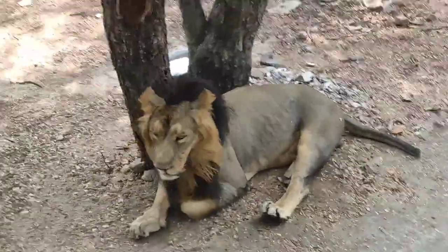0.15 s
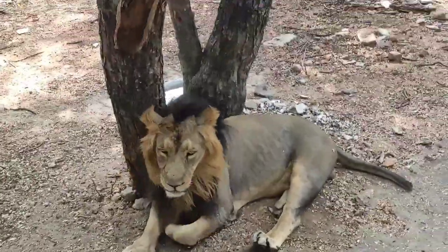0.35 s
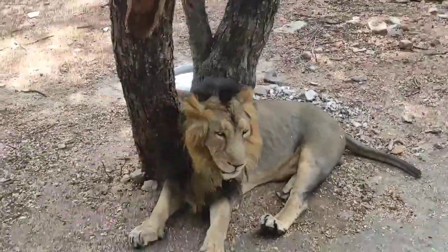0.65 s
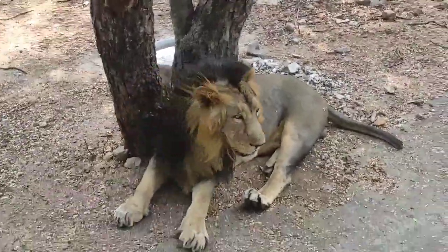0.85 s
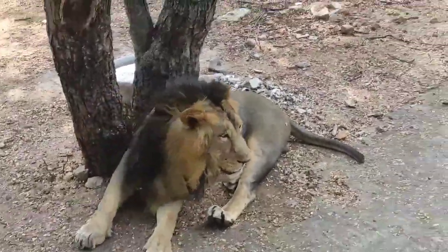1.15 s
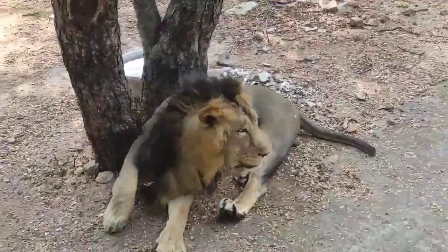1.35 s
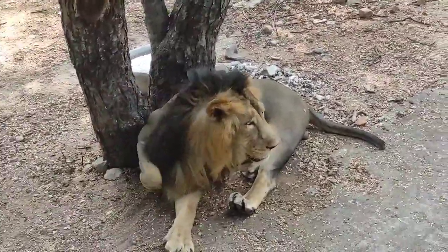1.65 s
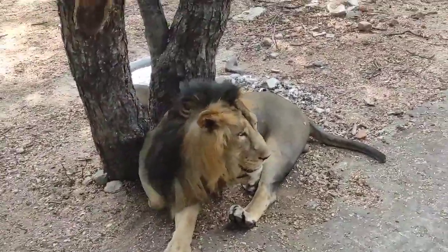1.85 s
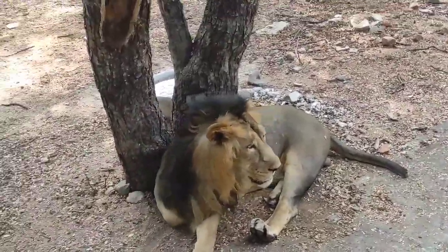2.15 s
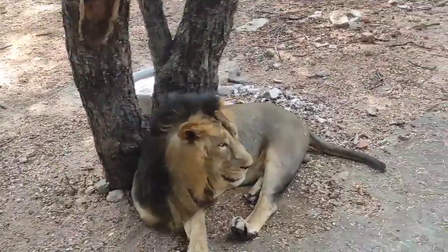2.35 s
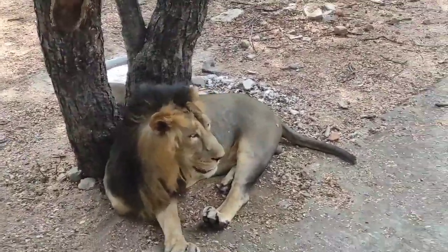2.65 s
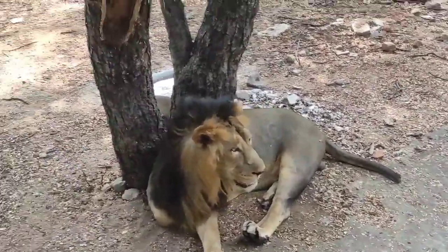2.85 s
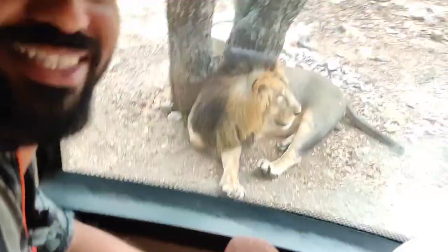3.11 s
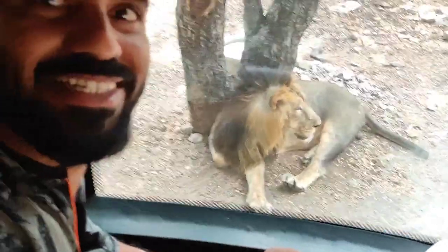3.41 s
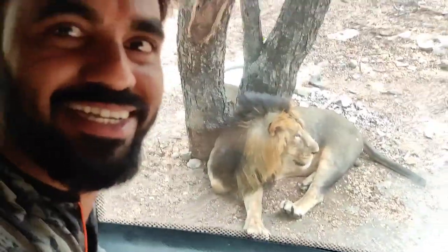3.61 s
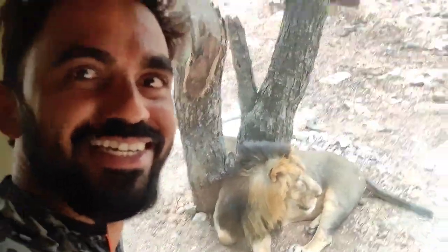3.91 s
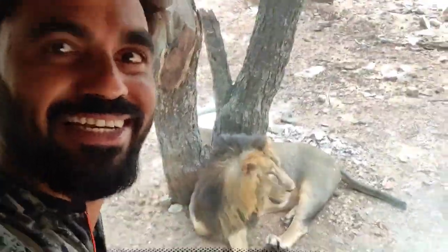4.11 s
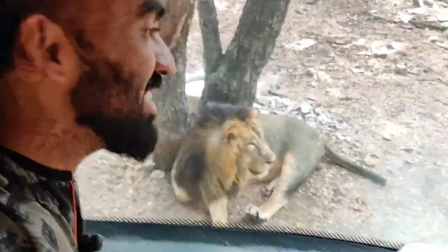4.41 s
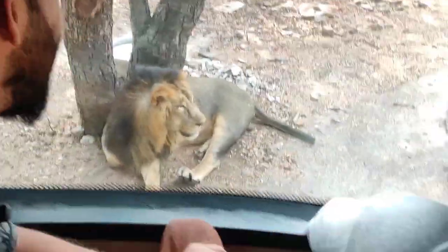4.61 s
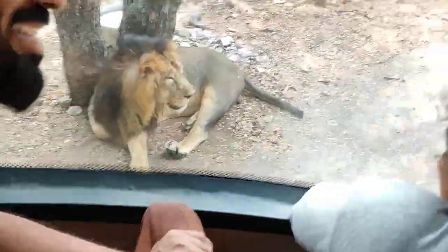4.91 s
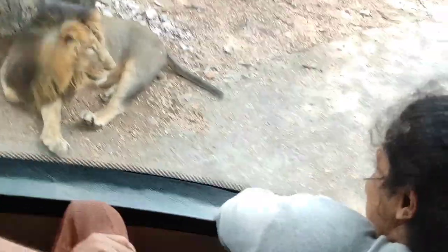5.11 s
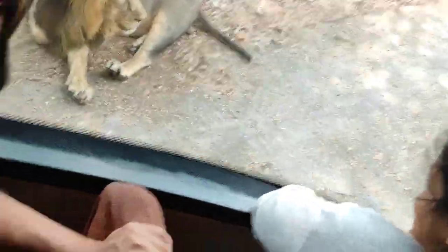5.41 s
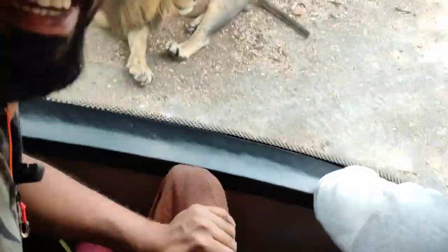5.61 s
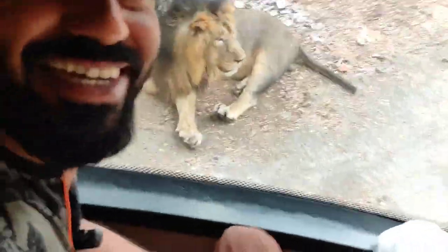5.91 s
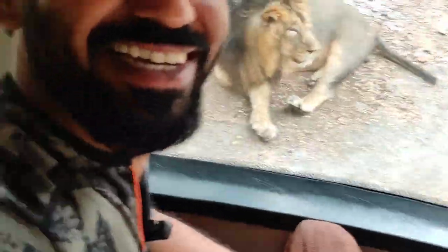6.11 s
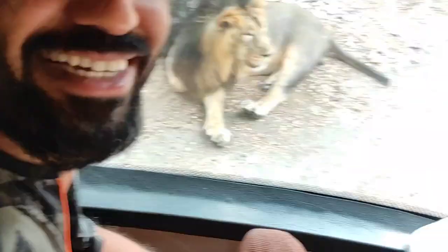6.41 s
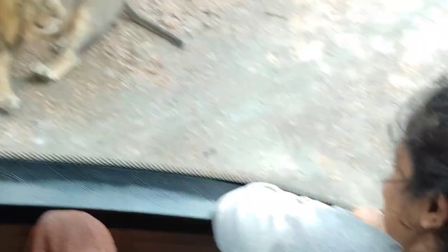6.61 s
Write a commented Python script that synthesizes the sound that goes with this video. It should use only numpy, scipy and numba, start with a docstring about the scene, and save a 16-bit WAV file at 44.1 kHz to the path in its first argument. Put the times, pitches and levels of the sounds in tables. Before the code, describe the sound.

One big lion, close and dry, centred. First a blasting throaty roar with a rough sung tone, then a shorter breathy grunt, a quick snort and a low fluttering growl fading nearly to nothing. A quiet rumble swells into a second roar of the same shape, a little lower, followed by the same fading grunt, snort and growl. A small hoarse grunt closes over faint steady hiss.

```python
"""A lion's hoarse roar close to the microphone, then a grunt, a snort and a dying growl.
A swell leads into the same calls repeated at a lower pitch, and a last grunt ends it over faint hiss.
Slack vocal folds flap some 20-45 times a second; each flap and its puff of breath ring chest, throat and mouth.
In the roars the throat also sings one rough tone, and the loudest swings clip the recorder.
The repeat reads the same tables with the resonances and the sung tone scaled down."""
import sys
import numpy as np
from scipy import signal
from scipy.io import wavfile
from scipy.ndimage import uniform_filter1d
from numba import njit

SR = 44100
rng = np.random.default_rng(int(sys.argv[2]) if len(sys.argv) > 2 else 0)


def unload_audio(sound):
    """Save the sound as a 16-bit wav file, at the path given as the first command line argument."""
    columns = np.transpose(np.atleast_2d(sound))
    # keep every value between -1 and 1, then stretch to whole-number steps
    steps = np.round(np.clip(columns, -1, 1) * 32767)
    wavfile.write(sys.argv[1], SR, steps.astype(np.int16))


N = 297895

# single hard flaps that stand out, before the resonances: at_s, level_db, brightness_db [re level_db]
POPS = [(0.062, -5, -5), (0.225, -21, 14), (0.283, -15, 1), (0.355, -10, -13), (0.398, -4.5, -25),
        (0.424, -9, -23), (0.45, -13, -20), (0.477, -9.5, -12), (0.507, -41, 0), (0.57, -14.5, -13),
        (0.602, -26.5, 7), (0.638, -14.5, -1), (0.853, -22.5, 10), (0.885, -14.5, -18), (0.916, -31, -6),
        (1.015, -32, -8), (1.108, -22, -14), (1.178, -21.5, 0), (1.479, -33, 0.5), (1.516, -36, -15),
        (1.552, -40, 12), (1.577, -31, 6), (1.652, -21, -24), (1.893, -51, -1), (1.924, -48, -2),
        (1.957, -39, -11), (1.987, -32, 1), (2.022, -44, -6), (2.056, -45, 9), (2.091, -53, 19),
        (2.128, -54, -5), (2.202, -57, 17), (2.24, -61, -5), (2.278, -50, 12), (2.313, -45, 11),
        (2.354, -46, 9), (2.394, -52, 12), (2.484, -39.5, -14), (2.84, -44, 2), (2.887, -36, 4),
        (3.066, -25, -6), (3.103, -29, -11), (3.14, -27, -6), (3.237, -34.5, -12), (3.276, -19.5, 6),
        (3.322, -24, -18), (3.358, -21, -16.5), (3.535, -28, 4.5), (3.6, -26, -5), (3.664, -6, -8),
        (3.688, -20, -8), (3.712, -31, -28), (3.741, -5.5, -20), (3.768, -14, -2), (3.845, -33, -3),
        (3.906, -24, 6), (3.942, -28, 14.5), (4.149, -20.5, 11.5), (4.186, -13.5, -6.5), (4.275, -25, -33),
        (4.488, -22, 2.5), (4.79, -30, 1), (4.849, -35, 11), (4.878, -26, 4), (4.952, -10, -19.5),
        (5.174, -24, -27.5), (5.196, -43, -2), (5.231, -48, -5), (5.265, -41, -8), (5.302, -29.5, 4),
        (5.338, -34.5, 3), (5.36, -42, -1), (5.399, -49, 20), (5.519, -50, 14.5), (5.582, -44, 11),
        (5.668, -41, 5), (5.745, -52, 0), (5.794, -37, -8.5), (5.842, -47.5, -1)]
# roar, grunt, snort and growl repeated, pitched down: start_s, end_s, lag_s, pitch_scale [ratio]
REPEAT = (3.37, 5.92, 3.309, .915)
# belly and chest resonances before pitch scaling and sag: centre_hz, width_hz
LOW = [(63, 23), (108, 58.5)]
LOWER_S = 2.655  # from here some resonances lie lower and the treble ends lower


def undb(db):
    """Turns decibels into an amplitude factor."""
    return 10 ** (np.asarray(db) / 20)


def unit(x):
    """Scales to rms 1 over every seventh of a second."""
    return x / np.sqrt(uniform_filter1d(x ** 2, SR // 7) + 1e-12)


def clock():
    """Scene seconds, whether the repeat is under way, and the seconds at which tables are read."""
    start_s, end_s, lag_s, _ = REPEAT
    t = np.arange(N) / SR
    repeating = (t > start_s) & (t < end_s)
    return t, repeating, t - lag_s * repeating


def curves(table):
    """Table columns over time; the repeat reads the first calls' rows."""
    _, _, table_s = clock()
    s, *columns = np.transpose(table)
    return [np.interp(table_s, s, column) for column in columns]


def flicker(db, rate=25.0):
    """A quick random level wobble, sliding between steps at the given rate per second."""
    steps = int(SR / rate)
    random_steps = np.repeat(rng.standard_normal(400), steps)
    return undb(db * uniform_filter1d(random_steps, steps)[:N])


@njit
def resonance(x, hz, width):
    """State-variable band-pass with a moving centre, gain 1 there."""
    y, band, low = np.empty(len(x)), 0., 0.
    for i in range(len(x)):
        g, damping = np.tan(np.pi * hz[i] / SR), width / hz[i]
        v = (band + g * (x[i] - low)) / (1 + g * (g + damping))
        band, low, y[i] = 2 * v - band, low + 2 * g * v, damping * v
    return y


def steep(x, hz, width):
    """The same resonance twice: dark valleys beside it."""
    return resonance(resonance(x, hz, width), hz, width)


def faint_hiss():
    """Steady white noise under the voice, before the treble ceiling."""
    return undb(-64.5) * rng.standard_normal(N)


def posture():
    """Body settings of the call under way, drifting with its age and eased over each change."""
    # roar, grunt, snort, growl, swell, last grunt: start_s, belly_db, chest_db,
    # windpipe_db [these three re the level below the throat], sink_db_per_s [windpipe to belly], nose_db,
    # mouth_db, breath_db [these three re the level above the throat], dulling_db_per_s [breath to mouth],
    # windpipe_hz, throat_hz, mouth_hz, tongue_hz [centres before drift and pitch scaling],
    # mouth_glide_share_per_s [the tongue too], sag_share_per_s [chest and windpipe],
    # flaps_per_s [at the start], slowing_flaps_per_s2
    postures = [(0, -5, 1.5, 0.5, 5, -3.5, 3.5, -10.5, 1.5, 163.4, 264.6, 799.5, 1180, -0.07, 0.38, 32.7, -0.5),
                (0.714, -8.5, -2.5, 3, 12, -7.5, 1, -12.5, -4, 177.1, 260.6, 827, 1145, -0.032, 0.061, 36, 7.5),
                (1.465, -5, -3, -1.5, -8.5, -6, -3.2, -6, 12, 173.5, 282.8, 813, 1109, -0.073, 0.025, 32, -41),
                (1.72, -7.5, -4.5, -3, 2, -1.5, -0.5, -8, 0, 154, 297.4, 806, 1215, 0.11, 0.2, 33, 10.5),
                (2.664, -5, -0.5, -13.5, -0.5, 4.5, 3, -10.5, 3, 164.4, 278, 880, 1247, -0.036, 0.01, 24, -2.5),
                (5.916, -4.5, -1.5, -4.5, 6.5, -8.5, 0, -5, 0, 163.3, 271, 762, 1103, 0.035, 0.038, 40, 5)]
    # for the same six calls: flap_share [0-1, flaps rather than breath in the drive]
    flap_shares = [.4, .45, .3, .7, .5, .45]
    # likewise: snout_db [re the level above the throat]
    snout_levels = [-3.5, -3.5, -3, -4, -2.5, -2]
    # likewise: tongue_db [re the snout]
    tongue_levels = [8.2, 5.1, 7.1, 8.9, 2.3, 0.75]
    # likewise: hum_share [0-1, how much belly, chest and windpipe hum steadily]
    hum_shares = [.3, .2, .25, .6, .7, .25]
    _, _, table_s = clock()
    settings = np.column_stack([postures, flap_shares, snout_levels, tongue_levels, hum_shares])
    call = np.searchsorted(np.array(postures)[1:, 0], table_s)
    (start_s, belly, chest, pipe, sink, nose_db, mouth_db, breath_db, dulling,
     pipe_hz, throat_hz, mouth_hz, tongue_hz, glide, sag, flaps, slowing,
     share, snout_db, tongue_db, humming) = settings[call].T
    since = table_s - start_s
    below = (belly + sink * since, chest, pipe - sink * since)
    above = (nose_db, mouth_db + dulling * since, snout_db, breath_db - dulling * since, tongue_db, humming)
    gliding, sagging = 1 + glide * since, 1 - sag * since
    centres = (mouth_hz * gliding, tongue_hz * gliding, pipe_hz * sagging, throat_hz, LOW[1][0] * sagging)
    ease_samples = int(.04 * SR)
    return [[uniform_filter1d(x, ease_samples) for x in group]
            for group in (below, above, centres, (flaps - slowing * since, share))]


def folds(rate, share):
    """Uneven flaps that fall in with the hard ones: returns clicks, puff envelope, flap share."""
    jitter, scatter_db, hard_db = .07, 3.0, 2.5
    puff_s, leak, gating, closing = .016, .4, .68, .9
    clicks, hard, s = np.zeros(N), np.array(POPS)[:, 0], 0.
    for late, size in rng.standard_normal((400, 2)):
        period = np.clip(1 + jitter * late, .5, 2) / rate[int(s * SR)]
        near = hard[(hard > s) & (hard < s + 1.5 * period)]
        s = near[0] if len(near) else s + period
        if s * SR >= N:
            break
        clicks[int(s * SR)] = undb(hard_db if len(near) else scatter_db * size)
    share = np.clip(share, 0, 1)
    after = signal.lfilter([1], [1, -np.exp(-1 / (puff_s * SR))], clicks)
    # the folds seal for a 120th of a second just before a flap
    ahead = SR // 120
    coming = np.convolve(clicks > 0, np.ones(ahead))[ahead - 1:] - (clicks > 0)
    shut = 1 - closing * share ** 2 * np.clip(coming, 0, 1)
    gated = gating * share * uniform_filter1d(after, SR // 500)
    steady = leak * (1.1 - gating * share)
    return clicks, shut * (gated + steady), share


def breath(puffs, pitch):
    """Turbulent air through broad resonances, swelling and sinking more evenly than the puffs."""
    # breath colour before pitch scaling: centre_hz, width_hz, level_db
    breath_bands = [(4100, 270, 23.5), (4900, 3700, 18.5), (6600, 2400, -17), (9920, 12000, 7)]
    hiss = unit(uniform_filter1d(puffs, SR // 90) * rng.standard_normal(N))
    # neighbouring bands take opposite signs
    return sum((-1) ** k * undb(db) * resonance(hiss * flicker(3.5, 45.), hz * pitch, width)
               for k, (hz, width, db) in enumerate(breath_bands))


def hum(hz, rough, share):
    """A low resonance that partly settles into a wavering tone."""
    pitch_waver = flicker(20 * np.log10(1 + .045), 12.)
    tone = np.sin(2 * np.pi * np.cumsum(hz * pitch_waver) / SR) * flicker(2.5, 18.)
    return np.sqrt(2 * share) * tone + np.sqrt(1 - share) * unit(rough)


def low_body(drive, thump, air, chest_hz, pipe_hz, pitch, humming):
    """Belly, chest and windpipe, rung by the flaps and breath and humming in part."""
    (belly_centre, belly_width), (_, chest_width) = LOW
    belly_hz = belly_centre * pitch
    belly = hum(belly_hz, steep(drive, belly_hz, belly_width), humming)
    chest = hum(chest_hz, steep(thump, chest_hz, chest_width), humming)
    pipe = hum(pipe_hz, steep(thump, pipe_hz, 35.0), humming)
    rumble = unit(steep(air, np.full(N, 38.), 40.))
    return unit(belly) + undb(-8.0) * rumble, chest, pipe


def nose(drive, mouth_hz):
    """A broad flickering resonance about an octave under the mouth's."""
    return steep(drive * flicker(2.7), 0.5216 * mouth_hz, 150.0)


def mouth(drive, soft, mouth_hz):
    """The mouth's resonance, less a broader one a little lower."""
    main = unit(resonance((soft + drive) * flicker(1.5), mouth_hz, 60.))
    lower = unit(steep(soft * flicker(2.5), .84 * mouth_hz, 200.))
    return main - undb(-9) * lower


def snout(drive, tongue_hz, tongue_db, pitch):
    """The tongue's moving resonance and the snout's others, each catching the air unevenly."""
    # snout resonances above the tongue's, before pitch scaling: centre_hz, width_hz, level_db
    snout_bands = [(1524, 54, -11), (1800, 156, -3), (2211, 196, -2.5), (2858, 120, -6), (3155, 550, -11.5),
                   (4055, 250, -24)]
    wobble_db = 2.5
    # neighbouring bands take opposite signs
    upper = sum((-1) ** k * undb(db) * resonance(drive * flicker(wobble_db), hz * pitch, width)
                for k, (hz, width, db) in enumerate(snout_bands))
    tongue = undb(tongue_db) * resonance(drive * flicker(wobble_db), tongue_hz, 59.0)
    between = undb(-5.0) * steep(drive * flicker(wobble_db), 1370 * pitch, 660.0)
    return upper - tongue + between


def pops(mouth_hz, tongue_hz, pitch):
    """Hard flaps: a click with a short spit of air, ringing the same throat."""
    spit_tail_s = 0.0021
    dull, bright = np.zeros(N), np.zeros(N)
    s, level_db, bright_db = np.transpose(POPS)
    at = (s * SR).astype(int)
    dull[at], bright[at] = undb(level_db), undb(level_db + bright_db)
    spit_envelope = signal.lfilter([1], [1, -np.exp(-1 / (spit_tail_s * SR))], bright)
    spit = spit_envelope * rng.standard_normal(N)
    throat_ring = undb(20.0) * steep(dull, 262.0 * pitch, 220.)
    mouth_ring = undb(41.0) * resonance(dull, mouth_hz, 42.0)
    snout_ring = undb(19.0) * snout(bright + undb(-11.0) * spit, tongue_hz, 1.9, pitch)
    open_spit = undb(-21.0) * resonance(spit, 2600 * pitch, 3000.0)
    return throat_ring + mouth_ring + snout_ring + open_spit


def sung(puffs, pitch):
    """One throat tone a roar, throbbing with the flaps: returns tone and its power share."""
    # sung tone of the roar, before waver and pitch scaling: at_s, pitch_hz, throb_depth [0-1]
    sung_curve = [(0.06, 266.3, .5), (0.094, 297.5, 1), (0.16, 282.3, 1), (0.19, 255.4, 0.8),
                  (0.262, 272, 0.6), (0.31, 278, .7), (0.398, 281, 0.8), (0.502, 276, 0.99),
                  (0.7, 270.2, 1)]
    hz, throb = curves(sung_curve)
    first_s, last_s = sung_curve[0][0], sung_curve[-1][0]
    inside, = curves([(first_s, 0), (first_s + 0.025, 1), (last_s - .02, 1), (last_s, 0)])
    waver = unit(resonance(rng.standard_normal(N), np.full(N, 18.0), 21.0))
    beat = unit(uniform_filter1d(puffs, SR // 120)) ** np.clip(throb, 0, 1)
    tone = np.sin(2 * np.pi * np.cumsum(pitch * hz + 12.0 * waver) / SR)  # waver in Hz rms
    return np.sqrt(2) * tone * unit(beat), inside * .68


def throat(drive, puffs, throat_hz, late_pitch, repeat_pitch):
    """Hoarse throat resonances that give way in part to the sung tone in the roars."""
    tone, clear = sung(puffs, repeat_pitch)
    hoarse = unit(steep(drive, throat_hz, 62.0)) + undb(-5.0) * unit(steep(drive, 285 * late_pitch, 82.0))
    return np.sqrt(clear) * tone + np.sqrt(1 - clear) * unit(hoarse)


def lion():
    """Flaps and breath through belly, chest, windpipe, throat, nose, mouth and snout."""
    # roar, grunt, snort, growl it dies into, swell into the repeated roar, last grunt:
    # at_s, throat_db, below_throat_db, above_throat_db [levels before the body's own offsets]
    effort = [
        [(0.0, -24, -15, -23.5), (0.058, -16, -15.5, -31.5), (0.08, -8, -16, -15), (0.14, -2, -13.5, -10),
         (0.275, 1, -19, -18.5), (0.292, -12.5, -23, -18.5), (0.32, -5, -25, -18), (0.338, -11, -21, -20.5),
         (0.386, -9, -15, -23), (0.602, -15.5, -25.5, -39), (0.682, -21.5, -34, -43), (0.7, -33, -30, -58)],
        [(0.72, -29, -30, -37), (0.756, -32, -34, -37), (0.834, -22, -28.5, -32), (0.85, -16.5, -20.5, -28),
         (1.014, -21, -20, -32.5), (1.23, -29, -29, -39), (1.374, -48.5, -44.5, -58), (1.39, -54, -46, -74),
         (1.448, -58, -56, -71), (1.46, -42, -52, -69)],
        [(1.47, -52, -57, -68), (1.48, -39, -31.5, -46.5), (1.542, -46, -39.5, -58), (1.554, -27.5, -34, -40),
         (1.566, -52, -32, -53), (1.594, -26, -31, -30), (1.628, -21, -21, -30), (1.652, -32, -24.5, -18.5),
         (1.71, -28, -31, -30), (1.74, -46, -25, -30)],
        [(1.76, -34, -27, -27.5), (1.79, -30, -20.5, -30.5), (2.126, -43.5, -33.5, -53),
         (2.16, -42, -35.5, -46.5), (2.266, -49.5, -35.5, -57.5), (2.28, -45, -47, -52.5),
         (2.304, -51, -36, -54.5), (2.498, -52.5, -41, -56), (2.624, -62.5, -47, -73), (2.66, -67, -38, -69.5)],
        [(2.67, -58, -61.5, -49.5), (2.72, -44, -38.5, -50), (2.972, -33, -25.5, -49),
         (3.098, -33, -26.5, -46.5), (3.2, -34.5, -24, -44.5), (3.238, -22, -19, -40.5),
         (3.262, -23.5, -16.5, -45), (3.278, -24.5, -14.5, -37), (3.302, -28, -13.5, -38.5),
         (3.326, -17, -22, -30), (3.344, -26, -11, -31), (3.37, -5, -9.5, -16)],
        [(5.93, -63, -44.5, -77), (5.974, -56, -59, -62), (5.992, -45, -40, -55), (6.056, -35.5, -31.5, -48),
         (6.338, -38, -33.5, -50), (6.38, -44.5, -32.5, -48), (6.438, -49, -51, -53), (6.484, -43.5, -38, -52),
         (6.668, -60.5, -55.5, -68.5), (6.72, -63, -64, -63.5)],
    ]
    throat_db, below_db, above_db = curves(np.vstack(effort))
    below, above, centres, flaps = posture()
    belly_db, chest_db, pipe_db = (below_db + db for db in below)
    nose_db, mouth_db, snout_db, breath_db = (above_db + db for db in above[:4])
    tongue_db, humming = above[4:]
    t, repeating, _ = clock()
    repeat_pitch = np.where(repeating, REPEAT[3], 1.)
    late_pitch = np.where(t > LOWER_S, REPEAT[3], 1.)
    mouth_hz, tongue_hz, pipe_hz, throat_hz, chest_hz = (repeat_pitch * hz for hz in centres)

    clicks, puffs, share = folds(*flaps)
    flapping = share * unit(clicks)
    air = unit(puffs * rng.standard_normal(N))
    drive = flapping + np.sqrt(1 - share ** 2) * air
    soft = .4 * flapping + air  # higher up the slack folds close softly, mostly puffs
    thump = drive + flapping  # low down the flaps count for more than the breath

    belly, chest, pipe = low_body(drive, thump, air, chest_hz, pipe_hz, late_pitch, humming)
    parts = [(belly_db, belly), (chest_db, chest), (pipe_db, pipe),
             (nose_db, nose(drive, mouth_hz)), (mouth_db, mouth(drive, soft, mouth_hz)),
             (snout_db, snout(soft, tongue_hz, tongue_db, repeat_pitch)),
             (breath_db, breath(puffs, late_pitch))]
    voice = undb(throat_db) * throat(drive, puffs, throat_hz, late_pitch, repeat_pitch)
    voice = voice + sum(undb(db) * unit(part) for db, part in parts)
    voice = voice + pops(mouth_hz, tongue_hz, repeat_pitch)
    # a side pocket of the throat swallows part of one band
    return voice - 0.33 * resonance(voice, 3500 * repeat_pitch, 340.0)


def scene():
    """One voice over a faint hiss, the same left and right, the treble ending lower from the swell on."""
    early_ceiling_hz, late_ceiling_hz, end_s = 10700, 9400, 6.71
    t, _, _ = clock()
    voice = lion() + faint_hiss()
    early, late = (signal.sosfilt(signal.ellip(10, .3, 80, hz, fs=SR, output="sos"), voice)
                   for hz in (early_ceiling_hz, late_ceiling_hz))
    fade = np.clip((end_s - t) / 0.004, 0, 1)
    return np.tile(np.where(t < LOWER_S, early, late) * fade, (2, 1))


def record(dry):
    """The loudest swings hit the recorder's rails with a rounded knee; the top is cut."""
    knee, top_hz = 8.0, 15700
    clipped = .97 * dry / (1 + np.abs(dry) ** knee) ** (1 / knee)
    return signal.sosfilt(signal.ellip(8, .2, 70, top_hz, fs=SR, output="sos"), clipped)


dry = scene()
out = record(dry)
unload_audio(out)
```